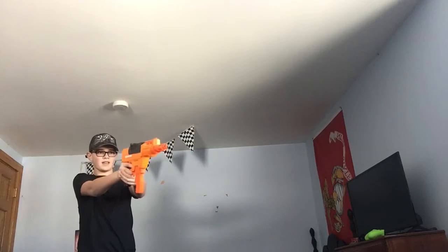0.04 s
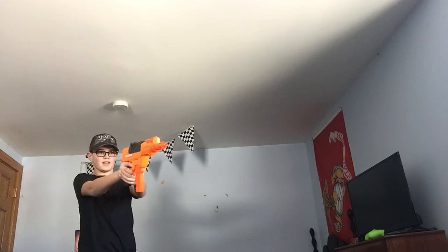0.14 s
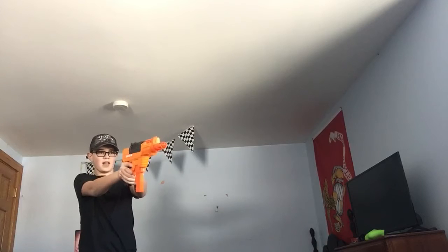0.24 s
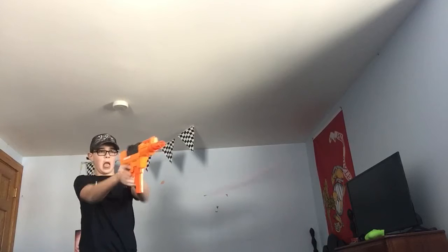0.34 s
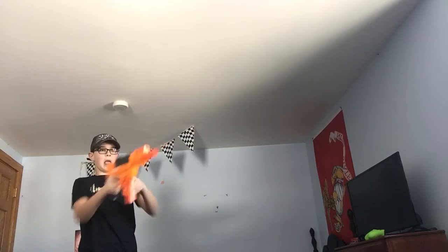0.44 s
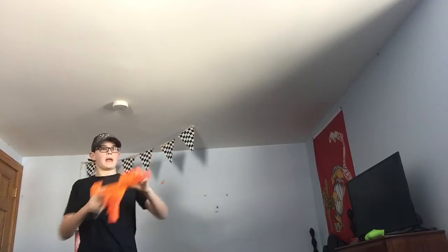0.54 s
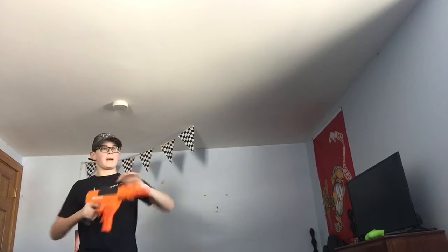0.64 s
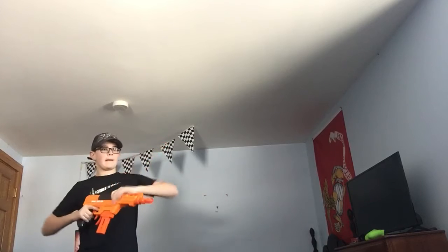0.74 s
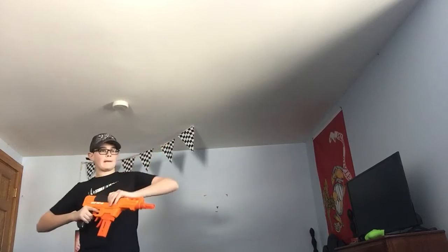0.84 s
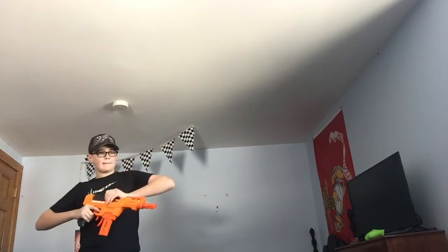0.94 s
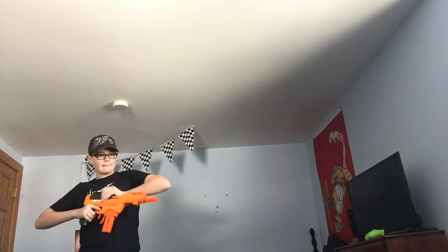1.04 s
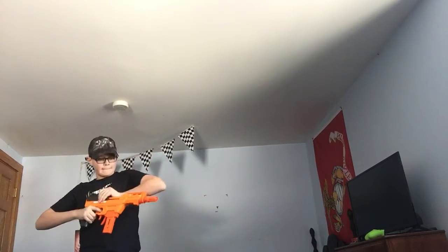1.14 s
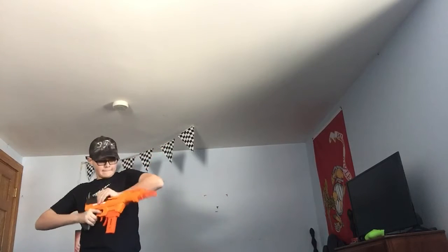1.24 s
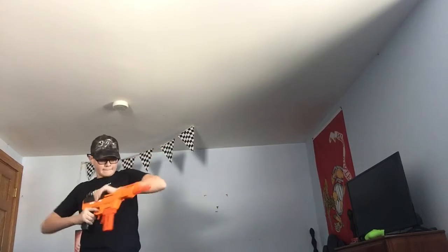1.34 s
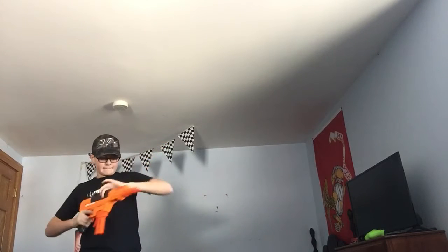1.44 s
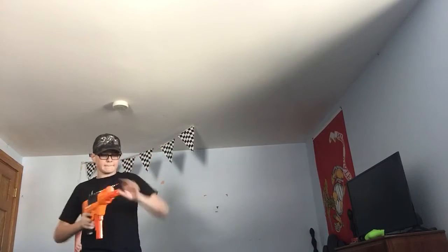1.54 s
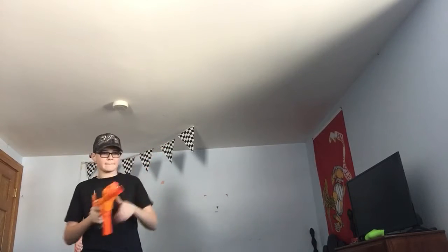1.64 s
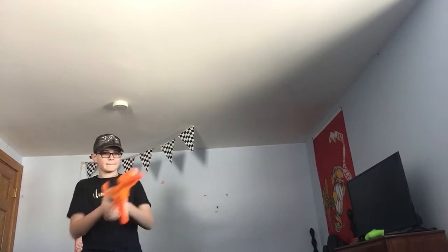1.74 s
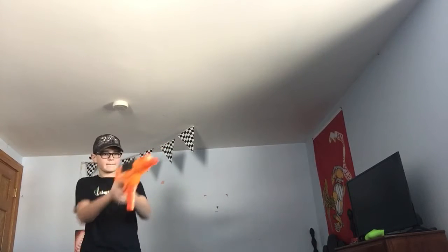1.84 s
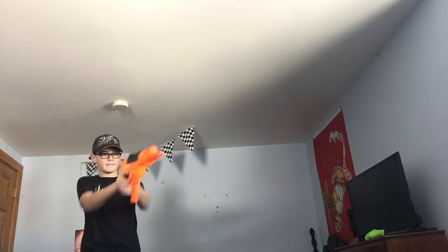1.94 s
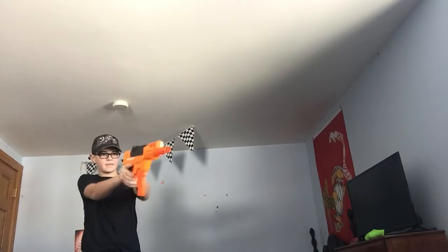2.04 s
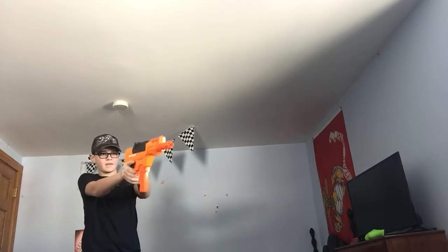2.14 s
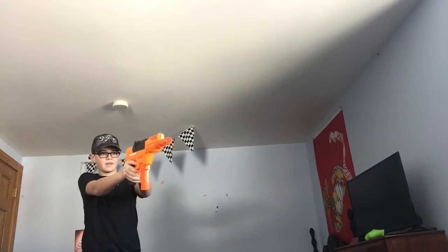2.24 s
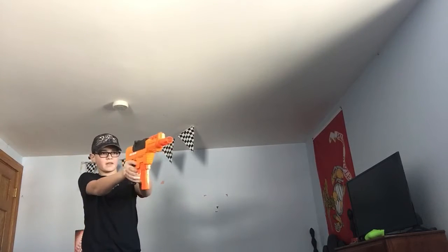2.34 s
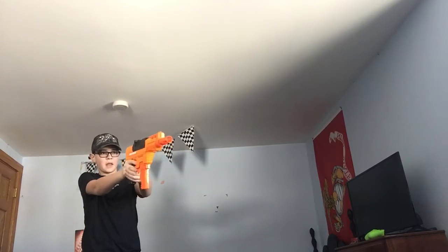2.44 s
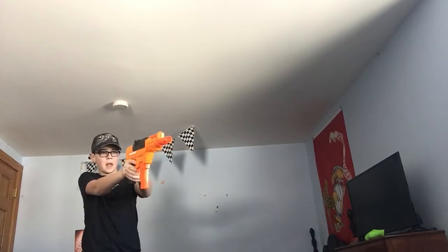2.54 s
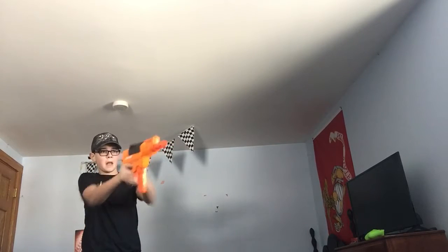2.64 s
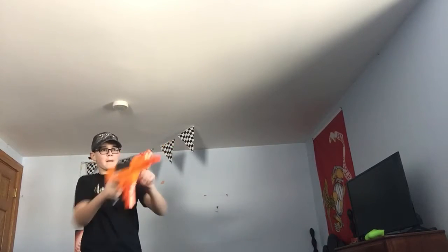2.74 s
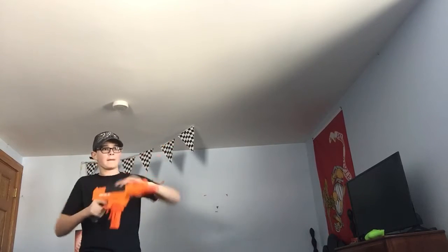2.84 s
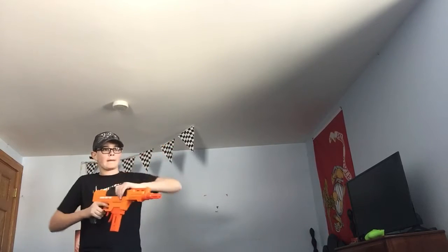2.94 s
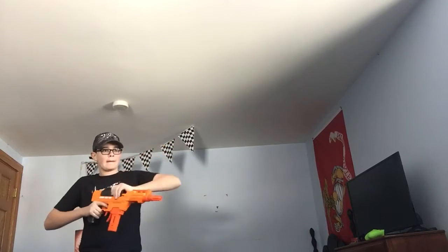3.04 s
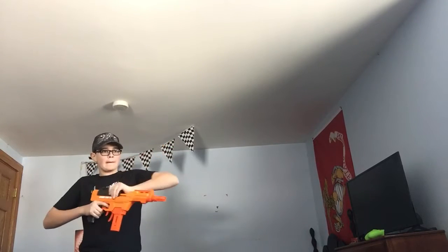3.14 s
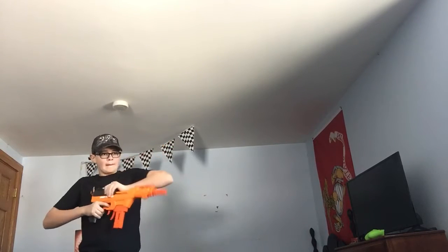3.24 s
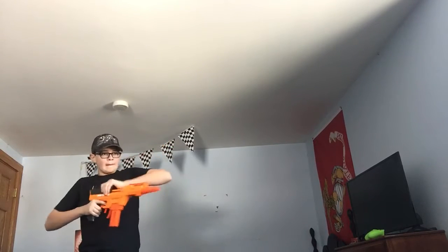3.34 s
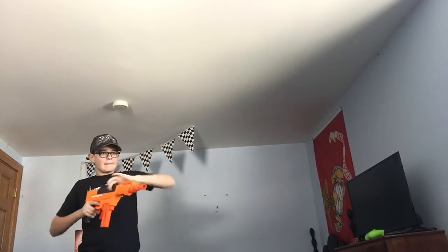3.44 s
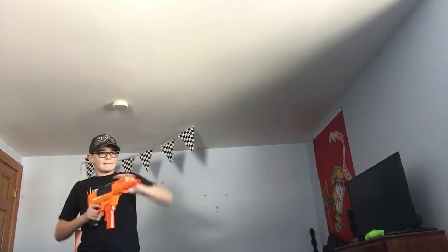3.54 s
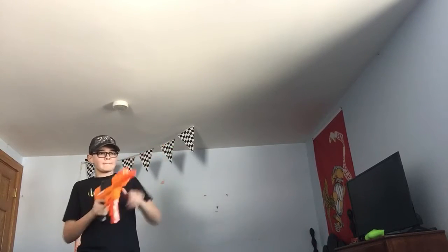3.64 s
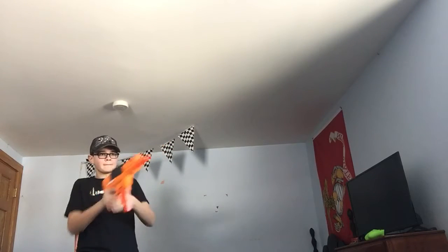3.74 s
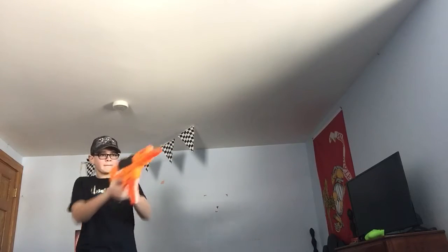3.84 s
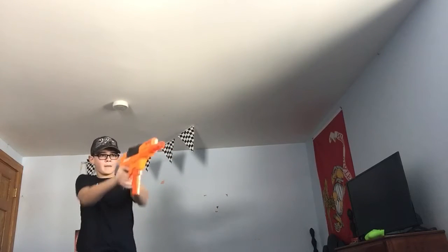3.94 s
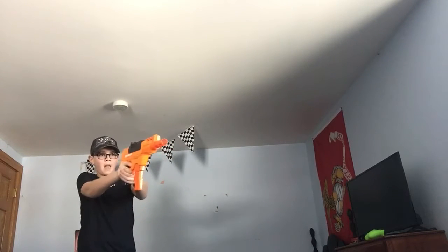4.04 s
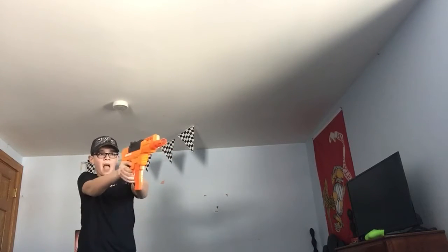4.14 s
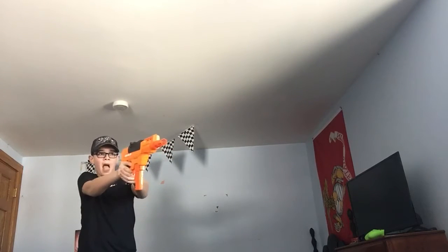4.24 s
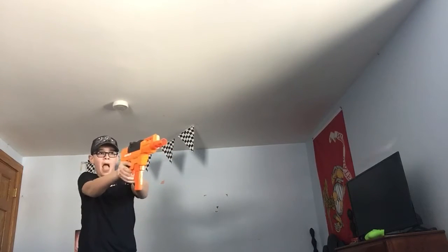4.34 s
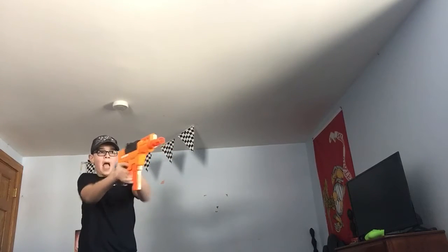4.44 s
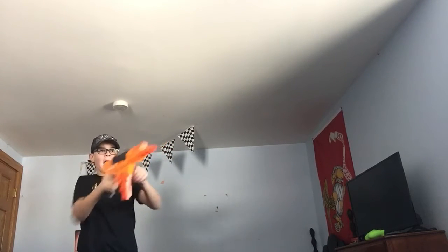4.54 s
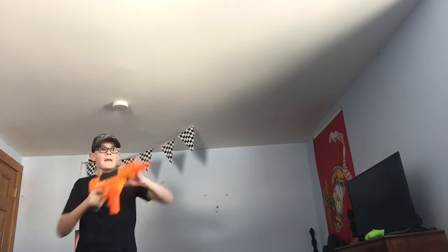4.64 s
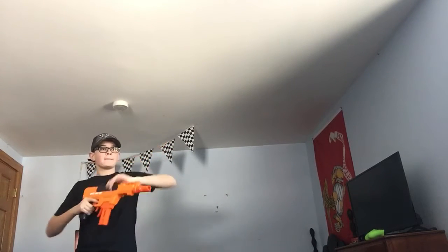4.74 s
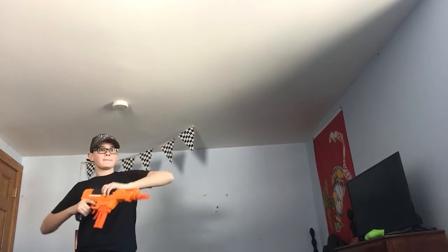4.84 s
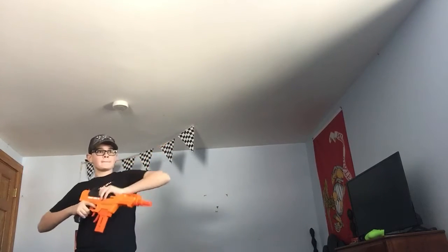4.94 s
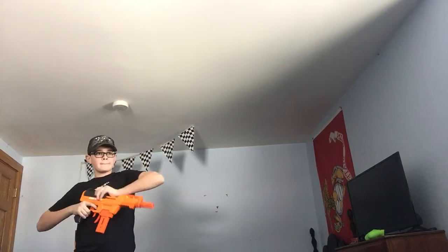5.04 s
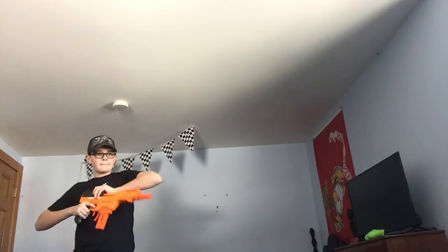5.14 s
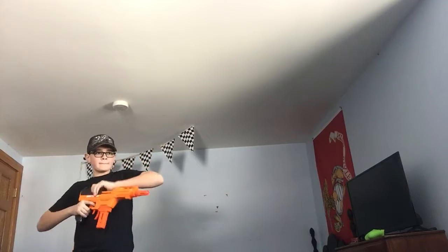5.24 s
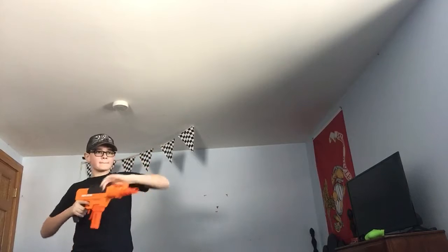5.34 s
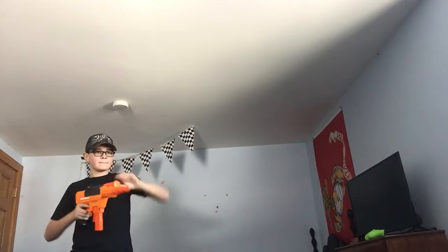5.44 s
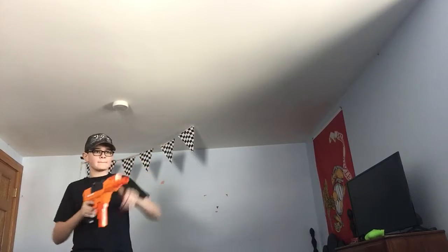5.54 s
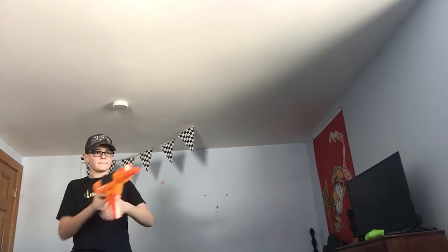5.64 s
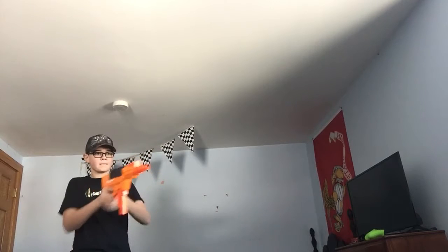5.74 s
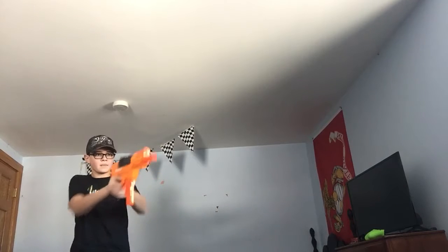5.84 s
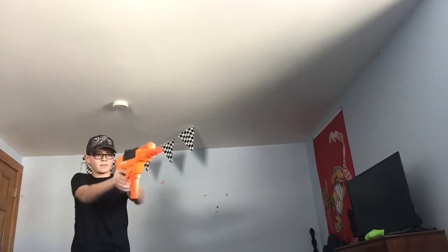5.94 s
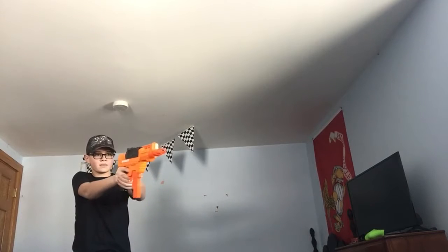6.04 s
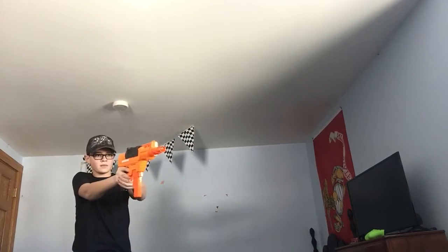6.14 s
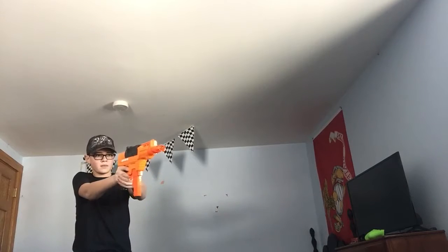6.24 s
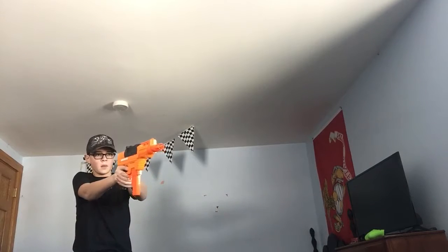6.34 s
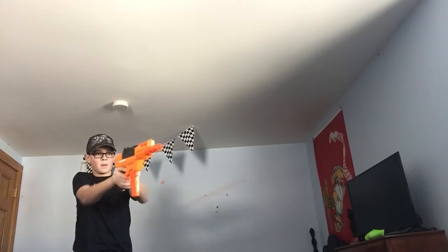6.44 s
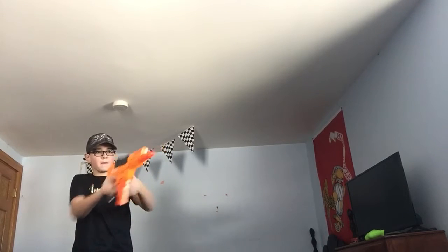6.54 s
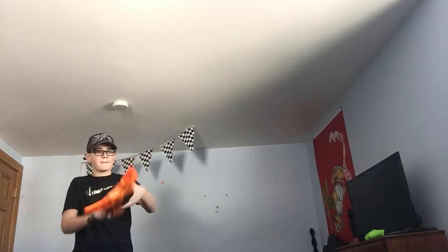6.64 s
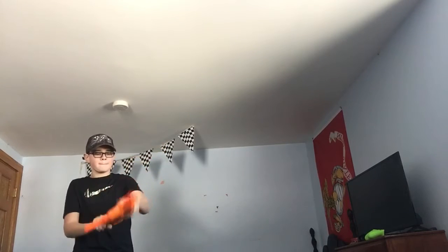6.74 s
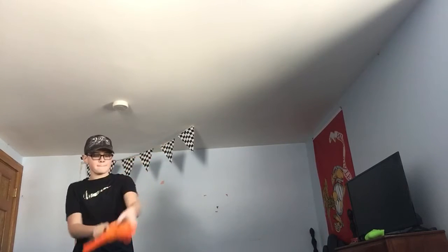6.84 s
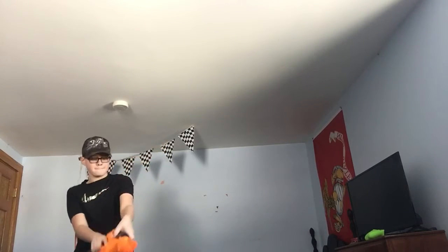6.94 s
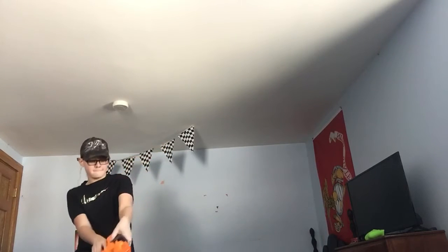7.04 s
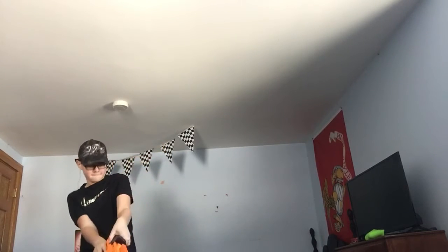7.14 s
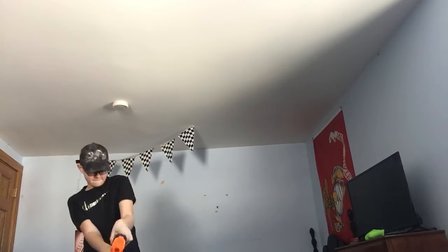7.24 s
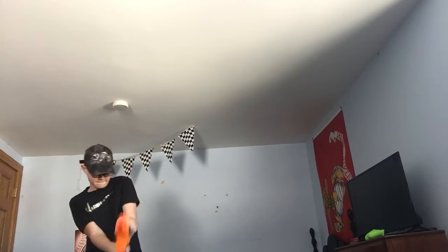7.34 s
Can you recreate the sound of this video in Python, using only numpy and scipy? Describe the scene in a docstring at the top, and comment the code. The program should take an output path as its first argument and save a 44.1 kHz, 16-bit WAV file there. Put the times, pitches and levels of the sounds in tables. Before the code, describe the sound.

A spring-powered toy blaster fires four loud, overloaded snaps in a small bedroom, with plastic slide clacks and handling rattles priming it between shots.

```python
"""A faint room hiss, then a small tick and a bang: a spring-powered toy blaster fires in a small bedroom.
It fires four times. In each shot a plunger rushes forward, chattering, with a hollow pop of air, and slams home;
loud peaks overload the microphone, the barrel sings on and the slack spring shivers.
In between, two strokes of a slide prime it: they rub, catch and hit a stop, while hands knock on the shell,
loose parts tick and the spring rings faintly. Contacts are shaped noise; ringing parts are fading tones."""
import sys
import numpy as np
from scipy import signal
from scipy.fft import rfft, irfft
from scipy.io import wavfile
from scipy.ndimage import uniform_filter1d

SR = 44100
rng = np.random.default_rng(int(sys.argv[2]) if len(sys.argv) > 2 else 0)


def materialize(psi):
    """Save the field psi as 16-bit PCM at rate SR to the path in sys.argv[1].

    A 1-D psi becomes a single channel; in a 2-D psi each row is a channel.
    """
    bounded = np.clip(np.atleast_2d(psi).T, -1, 1)
    quanta = np.round(bounded * 32767).astype(np.int16)
    wavfile.write(sys.argv[1], SR, quanta)


N = 326340
T = np.arange(SR) / SR  # one second of time, used to shape single sounds

# Steady sound of the quiet room: (frequency [Hz], relative level [dB])
ROOM_AIR = [(15, -65), (25, -28), (61, -6.5), (111, -2), (170, -5.5), (206, -10.5), (317, -13.5),
            (624, -13), (754, -16), (2410, -18), (5000, -23.5), (6380, -24), (11900, -31.5), (16000, -32)]
# How slowly the room's echoes die: (frequency [Hz], time to fall by 60 dB [s])
ROOM_DECAY = [(60, 0.6), (150, 0.098), (400, 0.36), (1000, 0.31), (2800, 0.24), (6500, 0.24), (10000, 0.19),
              (15000, 0.14)]
# Shots: (release [s], slam [s], rush [dB], slam [dB], barrel ring before flutter [dB],
#         spring shiver at its start [dB], low air puff before a 1 dB cut [dB])
SHOTS = [(0.298, 0.3305, -4, -3, -7, -38, -44), (2.459, 2.499, -2, -4.5, -36.5, -36.5, -29),
         (4.3204, 4.354, -4, -1.5, -34, -34.5, -52.5), (6.3433, 6.381, -2.5, -4, -11, -37, -55.5)]
# Tone colour of the rushing plunger, before the shell resonates: (frequency [Hz], level [dB])
RUSH_COLOUR = [(60, -19.5), (130, -4), (250, -8.5), (420, -5), (640, -0.5), (1300, 3), (2200, 0),
               (3500, -2.5), (6000, -7), (10000, -18.5), (16000, -19.5)]
# Tone colour of the slam, before the shell resonates: (frequency [Hz], level [dB])
SLAM_COLOUR = [(60, -18), (200, -15.5), (450, -8), (1000, -1), (1800, 2.5), (3000, 0.5), (4500, -3.5),
               (6000, -3), (8500, -7), (12000, -9.5), (16000, -16)]
# Resonances of the shell: (frequency [Hz], width [Hz], lift [dB])
SHELL_RESONANCES = [(566, 60, 6), (730, 90, 2), (860, 50, 3), (1430, 50, 1), (1640, 70, 2), (1950, 70, 2),
                    (2170, 45, 4), (2780, 60, 3), (3600, 80, 2), (6200, 200, 2)]
# Ringing tones of the emptied barrel: (frequency [Hz], level [dB], time to fall by 60 dB [s])
BARREL_MODES = [(241, -8, 0.3), (977, -13, 0.27), (994, 0, 0.22), (1009, -5, 0.18), (998, -18, 0.62),
                (1016, -22, 0.55), (1119, -20, 0.42), (1184, -19, 0.32), (1355, -20, 0.3),
                (1857, -16, 0.22), (2171, -16, 0.18)]
# Tone colour of the released spring's shiver, before the shell resonates: (frequency [Hz], level [dB])
SHIVER_COLOUR = [(50, -21.5), (110, -8.5), (230, -7), (330, -4.5), (550, -8), (800, -6), (1200, 2),
                 (1500, -10), (2200, -19), (5000, -28.5), (16000, -52)]
# Hands taking hold of the shell and slide:
# (time [s], clack [dB], thud [dB], snap [dB], ringing pitch [Hz], length [s])
HAND_KNOCKS = [(0.759, -57.5, -54.5, -53, 950, 0.053), (0.811, -39, -37, -48, 830, 0.039),
               (0.892, -36, -41, -43.5, 1620, 0.022), (1.02, -51.5, -56.5, -69, 1740, 0.025),
               (1.314, -41, -63, -44.5, 660, 0.0062), (2.066, -52.5, -79, -52, 1700, 0.014),
               (2.243, -62, -71, -85, 2040, 0.0061), (2.309, -58, -70.5, -62, 2140, 0.022),
               (2.852, -44, -41, -75, 740, 0.039), (2.968, -47.5, -49, -65, 540, 0.0034),
               (3.042, -52, -47, -54, 842, 0.037), (3.092, -29.5, -34.5, -28.5, 875, 0.0093),
               (3.357, -40, -72, -45, 646, 0.0079), (3.567, -52, -41.5, -46, 860, 0.017),
               (3.776, -64, -55.5, -80.5, 670, 0.015), (3.838, -48.5, -58.5, -51, 1896, 0.021),
               (4.697, -39.5, -49, -43.5, 710, 0.0075), (4.775, -36, -39.5, -50, 1130, 0.0095),
               (4.858, -48, -52, -48.5, 2670, 0.016), (4.918, -31, -36, -34.5, 700, 0.016),
               (5.073, -49, -70, -47, 1760, 0.02), (5.767, -51, -56, -58, 868, 0.015),
               (5.83, -53.5, -45.5, -66, 684, 0.023), (6.058, -72, -53.5, -79, 499, 0.018),
               (6.609, -43.5, -41, -49, 590, 0.025), (6.739, -39.5, -44, -46, 620, 0.026),
               (6.799, -42, -43.5, -50, 800, 0.096), (6.916, -26, -33, -27.5, 760, 0.011),
               (7.012, -45, -45, -66, 840, 0.0085), (7.134, -41.5, -79, -41, 1580, 0.049),
               (7.286, -51, -49, -59, 1860, 0.019)]
# Tone colour of knocked plastic, before the shell resonates: (frequency [Hz], level [dB])
PLASTIC_COLOUR = [(59, -59.5), (100, -20.5), (149, -16.5), (243, -0.5), (519, -5.5), (712, 0.5), (1060, 3),
                  (1160, 6), (1460, -1), (2090, -5), (3050, -13), (6260, -17.5), (10400, -29), (12800, -26),
                  (15500, -31)]
# Ringing tones of the steel spring: (frequency [Hz], level [dB], time to fall by 60 dB [s])
SPRING_MODES = [(318, -13, 0.54), (720, -3.5, 0.57), (790, -4, 0.15), (816, 0, 0.16), (1017, -1.5, 0.32),
                (1220, -5, 0.57), (1310, -8.5, 0.5), (2490, -17.5, 0.72), (2600, -15.5, 0.5),
                (2640, -15, 0.7)]
# Spells of handling: (start [s], end [s], firmness at the top of the arch [dB])
HANDLING_SPELLS = [(0.767, 1.917, -59.5), (2.756, 3.889, -60), (4.492, 5.62, -57), (6.537, 7.393, -59)]
# A tick of a loose part, one row:
# (clack over firmness [dB], thud over firmness [dB], snap over firmness [dB], length [s])
LOOSE_TICK = (8, 4, 2, 0.0078)
# Strokes of the slide, back then forward in each priming:
# (catch engages [s], slide hits stop [s], rubbing pressure [dB], catch clack [dB],
#  stop clack [dB], stop thud [dB], stop snap [dB], stop's ringing pitch [Hz])
SLIDE_STROKES = [(1.146, 1.201, -41, -40, -28, -48, -23.5, 660),
                 (1.444, 1.477, -34.5, -29.5, -22, -31.5, -16, 1770),
                 (3.218, 3.246, -37.5, -38, -26.5, -37, -22.5, 1836),
                 (3.45, 3.477, -29.5, -31, -19, -29.5, -14.5, 845),
                 (5.145, 5.144, -35.5, -37.5, -25, -50, -23.5, 1140),
                 (5.358, 5.387, -34, -28, -20, -29, -14.5, 755)]
# Tone colour of the rubbing slide, before the shell resonates: (frequency [Hz], level [dB])
SCRAPE_COLOUR = [(100, -16), (300, -12.5), (700, -1.5), (1400, 3.5), (2200, -0.5), (3500, -1.5),
                 (7000, -11), (11000, -19), (16000, -17.5)]
# What all catches share, one row: (snap over clack [dB], length [s])
CATCH_SHAPE = (-4.5, 0.0054)


def amp(db):
    """Turns decibels into a multiplier."""
    return 10 ** (np.asarray(db) / 20)


def read(points, hz):
    """Reads a table's value at hz, joining its points by lines on a log frequency axis."""
    f, value = np.transpose(points)
    return np.interp(np.log(hz + 1), np.log(f + 1), value)


def add(mix, s, sound):
    """Lays a sound into the mix at time s."""
    part = mix[max(round(s * SR), 0):][:len(sound)]
    part += sound[:len(part)]


def evened(x):
    """Scales to an average strength (rms) of 1."""
    return x / np.sqrt(np.mean(x ** 2) + 1e-20)


def peaked(x):
    """Scales so that the loudest 5 ms have an rms of 1."""
    return x / np.sqrt(uniform_filter1d(x ** 2, size=220).max() + 1e-20)


def band(x, lo_hz, hi_hz):
    """Keeps the frequencies between two limits."""
    limits = [lo_hz, min(hi_hz, SR / 2 - 1)]
    return signal.sosfilt(signal.butter(3, limits, "band", fs=SR, output="sos"), x)


def shell_response(colour):
    """Sound of one tiny tap of this tone colour on the resonating shell."""
    hz = abs(np.fft.fftfreq(4096, 1 / SR))
    db = read(colour, hz)
    for f, width, lift in SHELL_RESONANCES:
        db = db + lift / (1 + (2 * (hz - f) / width) ** 2)
    # minimum phase: the response starts at once, with nothing ahead of the tap
    spectrum = np.exp(np.conj(signal.hilbert(np.log(amp(db)))))
    return np.fft.ifft(spectrum).real[:len(hz) // 2]


def contact(envelope, response):
    """A swarm of tiny impacts, as strong as the envelope, sounding through the shell."""
    impacts = rng.standard_normal(len(envelope)) * envelope
    return signal.fftconvolve(impacts[:SR // 8], response)


def ring(modes, rise_s):
    """Fading pure tones that swell in together."""
    tones = sum(amp(db - 60 * T / t60) * np.sin(2 * np.pi * hz * T) for hz, db, t60 in modes)
    return (1 - np.exp(-(T / rise_s) ** 2)) * tones


def air(level_db=-70):
    """Steady noise, coloured as the faint hiss and rumble of the room."""
    hz = np.fft.rfftfreq(N, 1 / SR)
    spectrum = rfft(rng.standard_normal(N)) * amp(read(ROOM_AIR, hz))
    return amp(level_db) * evened(irfft(spectrum, N))


def shots(trigger_db=-39, creep_db=-41, sear_db=-20, pop_db=-5.0, chatter_hz=265, chatter=0.56,
          rattle=0.17, rattle_decay_s=0.032):
    """The trigger ticks, the sear creeps and lets go, the plunger chatters forward and slams home."""
    out = np.zeros(N)
    rush, slam = shell_response(RUSH_COLOUR), shell_response(SLAM_COLOUR)
    judder = 1 + chatter * np.sin(2 * np.pi * chatter_hz * T)
    rush_shape = judder * (1 - np.exp(-T / 0.001)) * np.exp(-T / 0.0095)
    slam_shape = np.exp(-T / 0.0024) + rattle * np.exp(-T / rattle_decay_s)
    creep_shape = np.exp(-abs(T - 0.03) / 0.0026)
    for release, stop, rush_db, slam_db, *_ in SHOTS:
        add(out, release - 0.0212, amp(trigger_db) * peaked(contact(np.exp(-T / 0.0015), rush)))
        add(out, release - 0.034, amp(creep_db) * peaked(contact(creep_shape, rush)))
        add(out, release - 0.0045, amp(sear_db) * peaked(contact(np.exp(-T / 0.004), rush)))
        add(out, release, amp(rush_db) * peaked(contact(rush_shape, rush)))
        add(out, release, amp(pop_db) * air_pop())
        add(out, stop, amp(slam_db) * peaked(contact(slam_shape, slam)))
    return out


def air_pop(hz=310, sag_hz_per_s=4800, crest_s=0.0082, swell_s=0.0044, fade_s=0.0072,
            grip_hz=128, grip_db=-15, grip_t60_s=0.18):
    """The plunger drives the air column in a short falling tone; the recoil thumps the grip, lower still."""
    swell = np.exp(-((T - crest_s) / swell_s) ** 2)
    fade = np.exp(-abs(T - crest_s) / fade_s)
    envelope = np.where(T < crest_s, swell, fade)
    pitch = np.maximum(hz - sag_hz_per_s * T, hz / 2)
    pop = envelope * np.sin(2 * np.pi * np.cumsum(pitch) / SR)
    return pop + ring([(grip_hz, grip_db, grip_t60_s)], rise_s=0.0013)


def room(x, wet_db, build_s, turns_per_s, count=6):
    """Dense echoes build up and die, each band at its own speed; random tails take turns so no tone stands out."""
    wet = np.zeros(N)
    for k in range(count):
        echoes = rng.choice([-1., 1.], SR) * (rng.random(SR) < 5000 / SR)  # about 5000 a second
        hz, t, z = signal.stft(echoes, SR, nperseg=256)
        decay = amp(-60 * t / read(ROOM_DECAY, hz)[:, None])
        tail = signal.istft(z * decay, SR)[1][:SR]
        tail *= 1 - np.exp(-(T / build_s) ** 2)
        # each tail takes its turn
        away = (turns_per_s * np.arange(N) / SR - k) % count - 1
        share = np.cos(np.pi / 2 * np.minimum(away, 1))
        wet += signal.oaconvolve(x * share, tail[:SR // 2] / np.linalg.norm(tail))[:N]
    return x + amp(wet_db) * wet


def puffs(rise_s=0.022, decay_s=0.083, linger_db=-24, linger_s=0.075):
    """Each shot shoves air at the microphone: low noise that swells and rumbles away."""
    out = np.zeros(N)
    fall = np.exp(-T / decay_s) + amp(linger_db) * np.exp(-T / linger_s)
    shape = (1 - np.exp(-T / rise_s)) * fall
    for release, *_, puff_db in SHOTS:
        rumble = band(rng.standard_normal(SR) * shape, 31, 70)
        add(out, release, amp(puff_db - 1.0) * peaked(rumble))
    return out


def after_ring(shiver_t60_s=0.92, flutter_db=3.0):
    """After the slam the barrel sings unevenly; fading noise stands for the slack spring's many close tones."""
    out = np.zeros(N)
    response, barrel = shell_response(SHIVER_COLOUR), ring(BARREL_MODES, rise_s=0.017)
    for _, stop, _, _, ring_db, shiver_db, _ in SHOTS:
        coils = evened(signal.fftconvolve(rng.standard_normal(SR), response)[:SR])
        flutter = evened(band(rng.standard_normal(SR), 6, 30))
        singing = amp(ring_db + flutter_db * flutter) * barrel
        shiver = amp(shiver_db - 60 * T / shiver_t60_s) * coils
        add(out, stop, singing + shiver)
    return out


def knocks(rows, rise_s, tone_db, tone_width_hz, thud_length, top_hz, dulling, grit_db,
           body_hz=315, sag=0.15, dull_db=-3):
    """Each knock is a snap, a clack with one ringing panel, and a hollow thud that sags as the hand closes."""
    out, plastic, t = np.zeros(N), shell_response(PLASTIC_COLOUR), T[:SR // 8]
    onset = 1 - np.exp(-t / rise_s)
    for s, clack, thud, snap, hz, length in rows:
        # the faces chatter as they meet
        grit = amp(grit_db * evened(uniform_filter1d(rng.standard_normal(len(t)), size=90)))
        impact_shape = grit * onset * np.exp(-(t / length) ** 1.3)
        hard = contact(impact_shape, plastic)[:len(t)]
        panel = peaked(band(hard, max(hz - tone_width_hz / 2, 100), hz + tone_width_hz / 2))
        clatter = peaked(band(hard, 470, 3000))
        dull = peaked(band(hard, 200, 520))
        edge_hz = max(top_hz * amp(dulling * snap), 6000)  # gentler contacts are duller
        pitch = body_hz * rng.uniform(0.85, 1.3) * (1 - sag * np.minimum(t / 0.025, 2))
        hollow_shape = onset * np.exp(-t / (thud_length * length))
        hollow = hollow_shape * np.sin(2 * np.pi * np.cumsum(pitch) / SR)
        add(out, s, amp(clack) * peaked(clatter + amp(tone_db) * panel))
        add(out, s, -amp(snap) * peaked(band(hard, 2600, edge_hz)))
        add(out, s, amp(thud) * peaked(peaked(hollow) + amp(dull_db) * dull))
    return out


def spring(priming, level_db):
    """The knocks and rubbing of priming set the steel spring ringing faintly."""
    return amp(level_db) * signal.oaconvolve(priming, ring(SPRING_MODES, rise_s=0.001))[:N]


def handling_level():
    """How firmly the hands work the toy: one swelling and fading arch for each spell."""
    level = np.zeros(N)
    for start, end, db in HANDLING_SPELLS:
        arch = np.sin(np.linspace(0, np.pi, round((end - start) * SR)))
        add(level, start, amp(db) * arch)
    return level


def loose_ticks(count=120, gap_s=0.085, low_hz=556, high_hz=1900):
    """Loose parts tick at uneven intervals, as strongly as the toy is being handled."""
    rows, level = [], handling_level()
    clack, thud, snap, length = LOOSE_TICK
    for k, (late, panel) in enumerate(rng.random((count, 2))):
        s = (k + late) * gap_s
        if s < (N - 1) / SR and level[int(s * SR)] > 1e-6:
            db = 20 * np.log10(level[int(s * SR)])
            hz = low_hz * (high_hz / low_hz) ** panel
            rows.append((s, db + clack, db + thud, db + snap, hz, length))
    return rows


def rub_level(swell_db_per_s=682, fade_db_per_s=890):
    """Each stroke rubs harder until the catch engages, holds until the stop, then dies away."""
    t, level = np.arange(N) / SR, np.zeros(N)
    for catch, stop, db, *_ in SLIDE_STROKES:
        before_db = swell_db_per_s * np.maximum(catch - t, 0)
        after_db = fade_db_per_s * np.maximum(t - stop, 0)
        level += amp(db - before_db - after_db)
    return level


def slides(level_db=-2, slips_per_s=600, spread_db=4, hiss=0.56, squeak_db=-3, squeak_hz=1500,
           wander=0.31, squeak_width_hz=200, grip_db=-1):
    """The slide rubs on its rails in many small slips, through a resonance whose pitch wanders at random."""
    pressure = rub_level() + amp(grip_db) * handling_level()
    slip_sizes = amp(np.minimum(spread_db * rng.exponential(1, N), 10))
    slips = (rng.random(N) < slips_per_s / SR) * slip_sizes
    rubbing = (slips + hiss) * rng.standard_normal(N)
    grain = evened(signal.oaconvolve(rubbing, shell_response(SCRAPE_COLOUR))[:N])
    drift = evened(uniform_filter1d(uniform_filter1d(rng.standard_normal(N), size=2000), size=1000))
    # shift the wandering pitch down to 0 Hz, smooth there to resonate, and shift back up
    turn = np.exp(2j * np.pi * np.cumsum(squeak_hz * np.exp(wander * drift)) / SR)
    smoothed = signal.lfilter([1], [1, -np.exp(-np.pi * squeak_width_hz / SR)], grain / turn)
    squeak = evened((turn * smoothed).real)
    return amp(level_db) * uniform_filter1d(pressure, size=300) * (grain + amp(squeak_db) * squeak)


def latches(catch_hz=1516, catch_thud_db=-16, stop_length_s=0.0087,
            rebound_s=0.014, rebound_db=-9.5, rebound_snap_db=-15):
    """Each stroke knocks at the catch and at the stop, then the slide bounces once off its stop."""
    rows = []
    catch_snap_db, catch_length_s = CATCH_SHAPE
    for catch, stop, _, catch_db, clack, thud, snap, hz in SLIDE_STROKES:
        rows.append((catch, catch_db, catch_db + catch_thud_db, catch_db + catch_snap_db,
                     catch_hz, catch_length_s))
        rows.append((stop, clack, thud, snap, hz, stop_length_s))
        rows.append((stop + rebound_s, clack + rebound_db, thud + rebound_db, snap + rebound_snap_db,
                     catch_hz, stop_length_s))
    return rows


def scene():
    """Shots aimed into the room and priming close to the chest, each with its own echoes."""
    firing = shots()
    hands = knocks(HAND_KNOCKS + loose_ticks(), rise_s=0.0012, tone_db=-0.5, tone_width_hz=700,
                   thud_length=0.85, top_hz=21000, dulling=0.12, grit_db=3)
    action = knocks(latches(), rise_s=0.003, tone_db=-1.5, tone_width_hz=290,
                    thud_length=0.8, top_hz=30040, dulling=0.25, grit_db=3.5)
    priming = action + hands + slides()
    priming = priming + spring(priming, level_db=-63)
    heard = room(firing, wet_db=-6, build_s=0.0065, turns_per_s=60)
    heard = heard + room(priming, wet_db=-4.5, build_s=0.0024, turns_per_s=90)
    return (heard + after_ring() + puffs() + air())[None]


def record(dry, ceiling=0.89, edge_hz=15950):
    """Loud peaks overload the input and are cut flat; then the highest treble is removed."""
    clipped = np.clip(dry, -ceiling, ceiling)
    lowpass = signal.firwin(401, edge_hz, window=("kaiser", 8), fs=SR)
    return signal.oaconvolve(clipped, lowpass[None], "same")


dry = scene()
out = record(dry)
materialize(out)
```